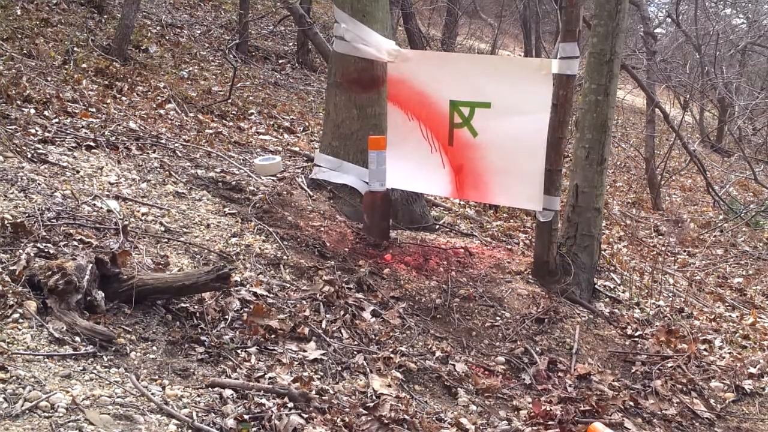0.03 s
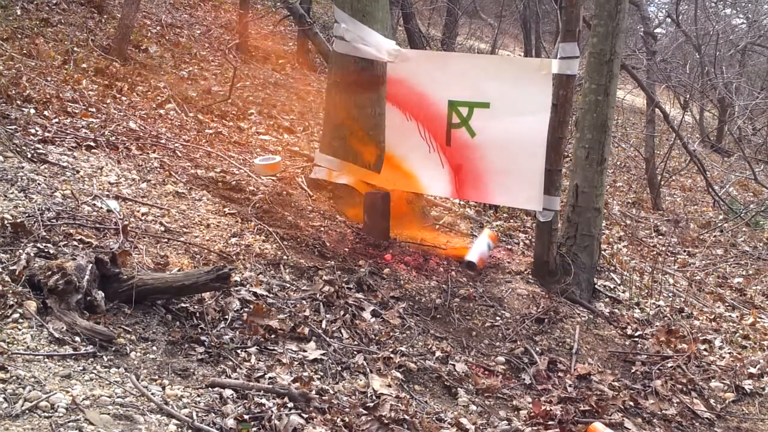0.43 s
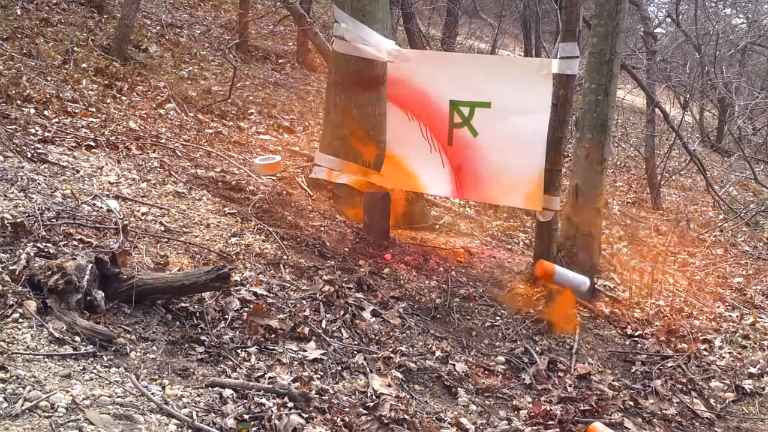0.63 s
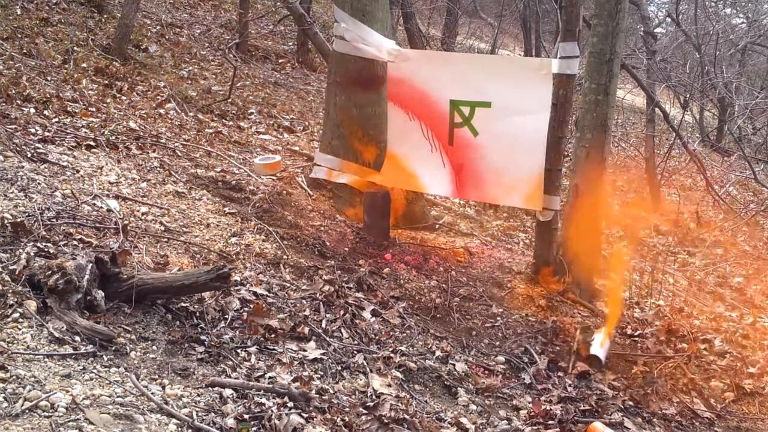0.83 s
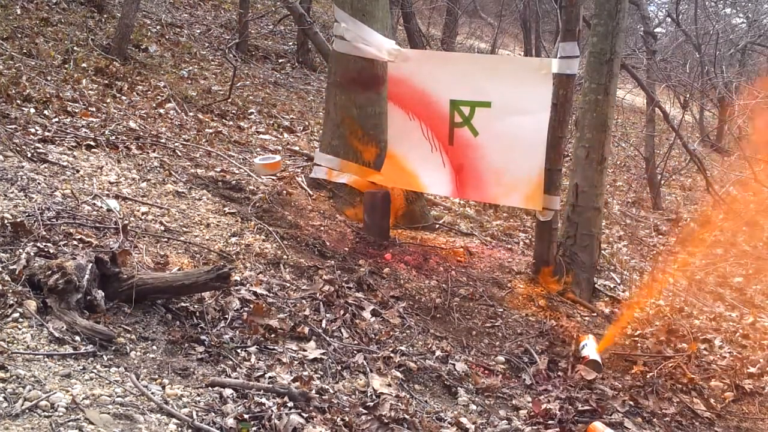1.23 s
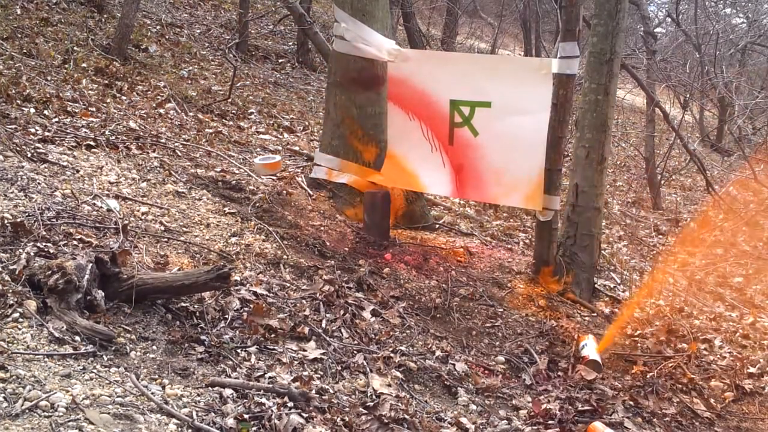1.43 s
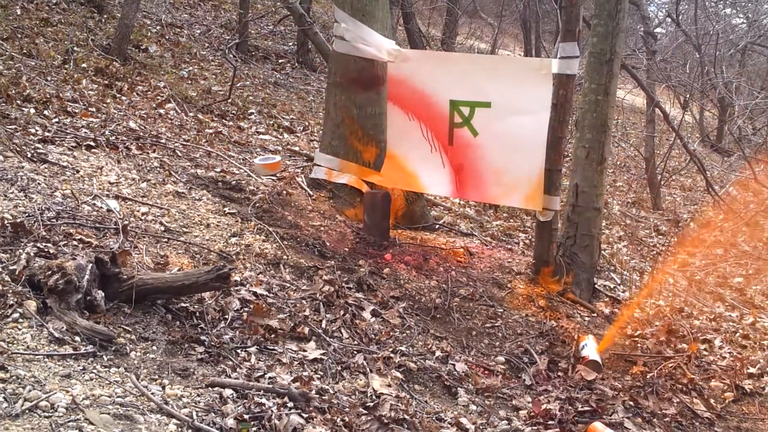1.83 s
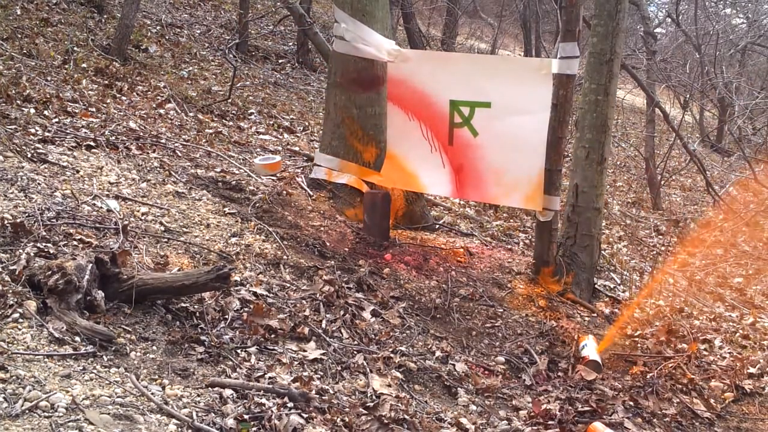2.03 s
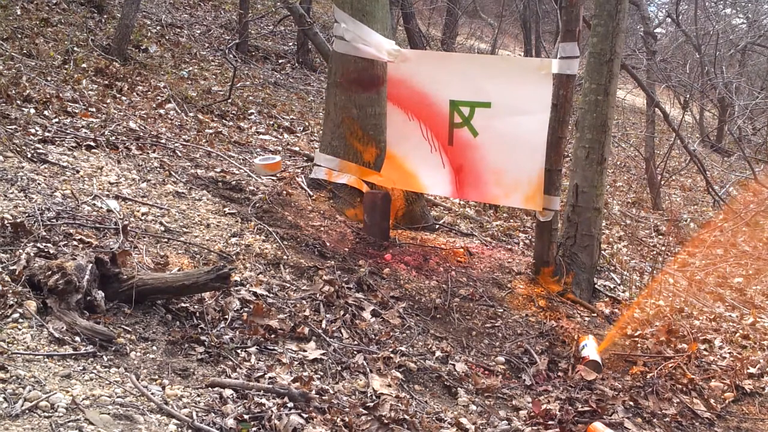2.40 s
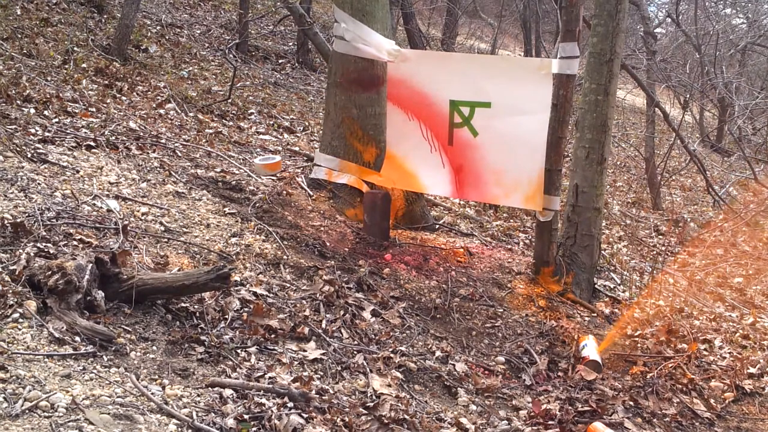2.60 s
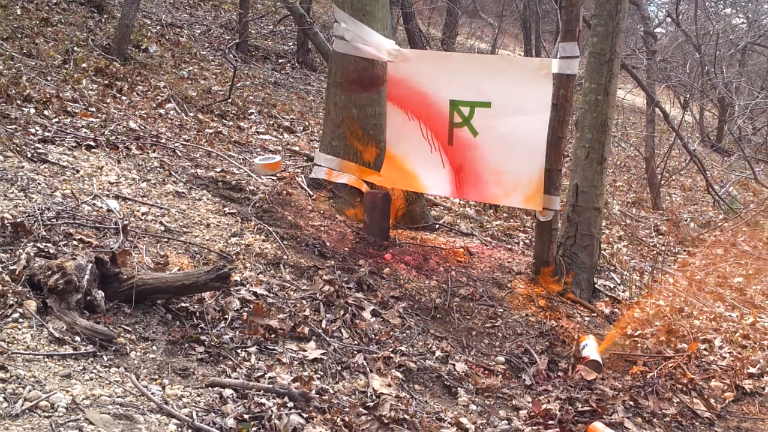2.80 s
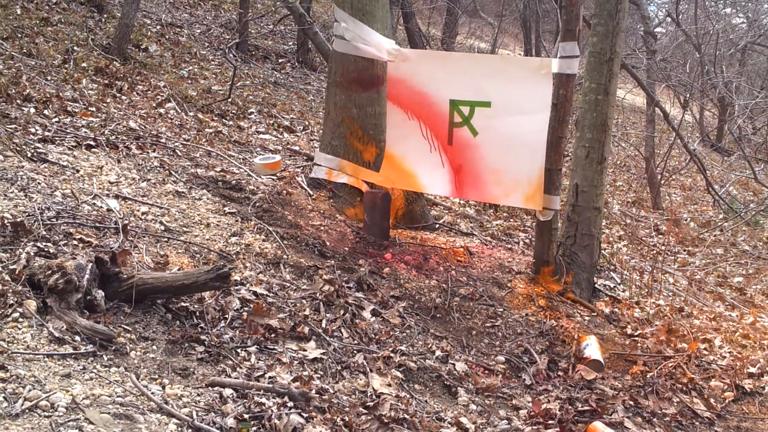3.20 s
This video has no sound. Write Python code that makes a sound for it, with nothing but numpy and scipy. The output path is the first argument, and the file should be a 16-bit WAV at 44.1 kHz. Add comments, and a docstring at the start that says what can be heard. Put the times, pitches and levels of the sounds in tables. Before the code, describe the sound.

A spray can hisses loudly in a quiet wood, punctured at about 0.2 seconds by a pellet's sharp, tinny crack. From 0.4 to 1.4 seconds it thuds and rolls through dry leaves, the hiss swirling and spitting. The hiss then steadies and thins, spurts around 2.7 seconds and fades out by 3.3. Two sharp clacks and a faint third sound close by around 3 seconds.

```python
"""A sharp crack and a tinny ring: a pellet tears into a spray can standing in a quiet wood.
Gas and paint hiss from the hole as the can falls, thuds and rolls through dry leaves, its jet swinging
towards and away from the listener. Then it lies still and hisses on, spurting as it runs empty.
Two sharp clacks and a faint third sound close by near the end; trunks scatter the sounds faintly."""
import sys
import numpy as np
from scipy import signal
from scipy.fft import rfft, irfft, next_fast_len
from scipy.io import wavfile
from scipy.ndimage import map_coordinates

SR = 44100
rng = np.random.default_rng(int(sys.argv[2]) if len(sys.argv) > 2 else 0)


def output_pcm(signal):
    """Save a mono or channel-first signal as 16-bit PCM at the path in sys.argv[1].

    Samples are clipped to [-1, 1] before scaling.
    """
    pcm = np.clip(np.atleast_2d(signal).T, -1, 1) * 32767
    wavfile.write(sys.argv[1], SR, np.round(pcm).astype(np.int16))


N = 147735
T = np.arange(N) / SR
AGE = np.arange(SR // 4) / SR  # time since an impact, s

# colour of the escaping spray: f/Hz, level/dB
JET_SPECTRUM = [(700, -30.5), (1020, -27), (1250, -30.5), (1720, -30.5), (1930, -22.5), (2540, -14),
                (3400, -14), (3800, -10.5), (4220, -12.5), (4650, -2.5), (5060, -7.5), (5600, 0),
                (6300, -1.5), (6850, -1), (7600, -7.5), (8740, -13.5), (9500, -10.5), (12500, -14.5),
                (14200, -19.5), (15700, -29)]


def amp(db):
    """Decibels to gain."""
    return 10 ** (np.asarray(db) / 20)


def unit(x):
    """Scale to rms 1."""
    return x / np.sqrt(np.mean(x ** 2) + 1e-20)


def along(points, hz):
    """Read (f/Hz, value) points on a log frequency axis."""
    freqs, values = np.transpose(points)
    return np.interp(np.log(hz + 1), np.log(freqs + 1), values)


def curves(rows):
    """One automation curve for each column after the time."""
    times, *columns = np.transpose(rows)
    return [np.interp(T, times, column) for column in columns]


def wobble(rate, size=N):
    """A smooth random curve, rate knots a second."""
    return map_coordinates(rng.standard_normal(4096), [T[:size] * rate], mode="wrap", order=2)


def filtered(x, response):
    """Shape x with a gain given as a function of frequency."""
    size = next_fast_len(len(x) + 2048, True)
    return irfft(rfft(x, size) * response(np.fft.rfftfreq(size, 1 / SR)), size)[:len(x)]


def low_cut(x, hz):
    """A fourth-order high-pass."""
    return signal.sosfilt(signal.butter(4, hz, "high", fs=SR, output="sos"), x)


def noise(spectrum, tilt_db=0, size=N):
    """Coloured noise of rms 1, tilted by tilt_db an octave."""
    white = rng.standard_normal(size)
    return unit(filtered(white, lambda hz: amp(along(spectrum, hz) + tilt_db * np.log2(hz + 1))))


def blow(t60, attack_s):
    """Envelope of one impact: a quick rise and an exponential fall."""
    return (1 - np.exp(-AGE / attack_s)) * amp(-60 * AGE / t60)


def burst(spectrum, t60, attack_s, tilt_db=0):
    """One dying burst of coloured noise."""
    return noise(spectrum, tilt_db, size=len(AGE)) * blow(t60, attack_s)


def ring(hz, t60, attack_s=0.00033):
    """One damped, slightly unsteady resonance."""
    return np.sin(2 * np.pi * hz * AGE + 0.61 * wobble(120, size=len(AGE))) * blow(t60, attack_s)


def placed(events):
    """Lay (t/s, level/dB, sound) events on one track."""
    track = np.zeros(N + SR)
    for s, db, sound in events:
        track[max(round(s * SR), 0):][:len(sound)] += amp(db) * sound
    return track[:N]


def background():
    """A bed of faint air and distant rumble, with a few soft puffs of air on the microphone."""
    # colours of the wood's air, the rumble and a puff: f/Hz, level/dB
    air_spectrum = [(25, -27), (100, -7), (220, -9), (380, -9), (640, -16), (1000, -13.5), (1700, -21.5),
                    (5000, -24.5), (12000, -31), (15000, -34)]
    rumble_spectrum = [(20, -35), (40, -16), (68, -4), (100, -8), (160, -13.5), (380, -8), (700, -24),
                       (1500, -38), (5000, -70)]
    puff_spectrum = [(25, -30), (45, -1), (70, 0), (105, 5), (160, -44), (400, -55), (2000, -100)]
    # puffs of air: t/s, level/dB, t60/s
    puff_events = [(0.038, -34, 0.12), (.1, -37.5, .14), (.33, -37, 0.18), (1.455, -40, 0.14)]
    puffs = placed((s, db, burst(puff_spectrum, t60, attack_s=0.0054)) for s, db, t60 in puff_events)
    air = amp(-51) * noise(air_spectrum)
    rumble = amp(-51 + 1.8 * wobble(8.12)) * noise(rumble_spectrum)
    return air + rumble + puffs


def trunks(send):
    """Diffuse scatter from the trees, each frequency dying at its own speed."""
    # decay of the scatter: f/Hz, t60/s
    decay = [(200, 0.37), (1000, 0.62), (2500, 0.55), (6000, 0.43), (14000, 0.11)]
    hz, t, bands = signal.stft(rng.standard_normal((SR * 3) // 4), SR, nperseg=256)
    tail = signal.istft(bands * amp(-60 * t / along(decay, hz)[:, None]), SR, nperseg=256)[1]
    predelayed = np.pad(send, (SR // 100, 0))
    return signal.fftconvolve(predelayed, tail / np.linalg.norm(tail))[:N]


def clack(t60, tilt_db, ring_hz, ring_db):
    """A hard, dry snap with two brief modes and a short rattle after it."""
    # colour of snap and rattle: f/Hz, level/dB
    spectrum = [(200, -35), (550, -37), (780, -9), (1150, 3), (1650, -8), (1900, -4), (2800, -7),
                (3400, -0.5), (4100, -4), (4900, 2), (5600, -9), (7400, -6), (8500, -14), (15000, -23)]
    snap = burst(spectrum, t60, attack_s=0.00016, tilt_db=tilt_db)
    rattle = amp(-10.5) * burst(spectrum, t60=0.072, attack_s=0.0017, tilt_db=tilt_db)
    high_mode = amp(ring_db) * ring(ring_hz, t60=0.02)
    low_mode = amp(-10.5) * ring(hz=1140, t60=0.02)
    return snap + rattle + high_mode + low_mode


def clacks():
    """Clacks close to the listener, from something too small to give any bass."""
    # the clacks: t/s, level/dB, t60/s, tilt/dB per octave, ring f/Hz, ring level/dB over the snap
    hits = [(2.9545, -16, 0.033, 0, 3000, 3.5), (3.0807, -5.5, 0.018, 0, 4500, -3),
            (3.156, -29.5, 0.03, 2, 4020, 7)]
    return low_cut(placed((s, db, clack(*shape)) for s, db, *shape in hits), hz=520)


def tumble():
    """Hollow thuds on the forest floor and the crunch of leaves under the rolling can."""
    # the can lands and bounces: t/s, level/dB, t60/s
    bounces = [(.4258, -13, 0.029), (.437, -29.5, 0.25), (.532, -20.5, 0.042), (0.5848, -15, 0.016),
               (.607, -30, 0.042), (.917, -32, .05), (0.929, -34.5, .05)]
    # colours of a thud and of the dry leaves: f/Hz, level/dB
    thud_spectrum = [(60, 2), (200, -18), (350, -3.5), (460, -0.5), (650, -30), (1100, 0.5), (1800, -16),
                     (2900, -9.5), (5000, -30), (12000, -45)]
    leaf_spectrum = [(40, -38), (90, -3.5), (180, -1), (350, 0.5), (650, -3.5), (1100, -4), (2000, -19),
                     (6000, -4), (14000, -44)]
    # rustle of the roll: t/s, level/dB
    roll = [(.42, -70), (.435, -33.5), (.5, -36), (.6, -30.5), (.68, -39), (.76, -57), (.84, -54.5),
            (.95, -37.5), (1.1, -41.5), (1.35, -58), (1.7, -83)]

    def thud(t60):
        """A dull impact plus the hollow knock of the can's body."""
        return burst(thud_spectrum, t60, attack_s=0.0011) + amp(-1.5) * ring(hz=380, t60=0.035)

    thuds = placed((s, db, thud(t60)) for s, db, t60 in bounces)
    crunch = unit(noise(leaf_spectrum) * amp(3.2 * wobble(250)))
    return thuds + amp(curves(roll)[0]) * crunch


def puncture():
    """The pellet strikes: a quick run of cracks as the wall tears, and a short tinny ring."""
    # the pellet's arrival and the tearing wall: t/s, level/dB, t60/s
    tears = [(0.2186, -21, 0.13), (.2241, -2.5, 0.022), (0.2276, -7, 0.029), (.2356, -5.5, 0.0098),
             (0.2391, -2.5, 0.013), (0.2469, -4.5, 0.034), (0.2575, -15.5, 0.077)]
    # colour of a crack: f/Hz, level/dB
    crack_spectrum = [(88, -50), (150, -21.5), (621, -19.5), (1030, -18), (1550, -17.5), (2240, -10.5),
                      (3870, -11), (4430, -4.5), (4980, 0.5), (6800, -7.5), (8590, -16), (12000, -16),
                      (15700, -28)]
    # modes of the can's wall: f/Hz, relative level/dB
    wall_modes = [(1012, 7.5), (2315, 3), (2720, 7), (5066, -2), (5997, 11), (6778, -1)]
    ring_start_s, ring_db = 0.2485, -18.5
    cracks = placed((s, db, burst(crack_spectrum, t60, attack_s=0.0002)) for s, db, t60 in tears)
    ringing = placed((ring_start_s, ring_db + db, ring(hz, t60=0.065, attack_s=0.0091))
                     for hz, db in wall_modes)
    return cracks + ringing


def spits():
    """Sudden spits of paint as the can jolts, in the colour of the jet."""
    # the spits: t/s, level/dB, t60/s, tilt/dB per octave
    jolts = [(0.5336, -7.5, 0.039, -2.5), (.5705, -3.5, 0.022, -3), (.584, -10, 0.036, -4),
             (.604, -13, .035, -6.5), (.684, -14, 0.05, -5.5), (.739, -29, 0.03, 3),
             (1.0565, -18, .04, -4.5), (1.072, -9, 0.033, -1.5), (1.252, -13.5, 0.045, -3)]
    spectrum = [(100, -90), (300, -62)] + list(JET_SPECTRUM)
    return placed((s, db, burst(spectrum, t60, attack_s=0.00051, tilt_db=tilt))
                  for s, db, t60, tilt in jolts)


def jet():
    """Gas and paint rush from the hole, changing colour as the can turns and sinking with the pressure."""
    # the jet swings round: t/s, hiss level/dB, roar level/dB over the hiss, fizz level/dB over the hiss
    swings = [(.27, -24.5, -9, -8), (.385, -31, -13, -9), (.425, -28, -2.5, -7), (.458, -21.5, -10.5, -18),
              (.475, -26, -9.5, -9), (.53, -24.5, -7.5, -9), (.545, -15.5, -19, -6),
              (.562, -12, -11.5, -3.5), (.585, -12.5, -9, -15), (.62, -19, -4, -10), (.632, -13, -4, -14),
              (.65, -14.5, -7, -4), (.675, -16, -11, -14), (.699, -9, -9.5, -8.5), (.73, -15, -8, -10),
              (.795, -25, -4.5, -8.5), (.848, -22, -4.5, -9.5), (.864, -11.5, -8, -17.5),
              (.912, -10.5, -17, -7), (.942, -16, -12.5, -5.5), (.965, -10.5, -15.5, -12),
              (1.008, -14, -12, -12), (1.02, -17.5, -10, -8), (1.046, -26.5, -9, -3),
              (1.058, -13, -13, -19), (1.09, -14.5, -14, -9.5), (1.12, -11, -14.5, -6.5),
              (1.16, -12.5, -13, -7.5), (1.27, -17, -14, -14), (1.33, -17, -13, -9),
              (1.425, -11.5, -16, -7), (1.52, -16, -13, -10.5), (1.61, -18, -14, -10)]
    # gain ride for the last spurts of the emptying can: t/s, level/dB
    emptying = [(2.6, -2.5), (2.66, -2), (2.7, 0.96), (2.735, -4.5), (2.77, -3), (2.81, 0.2), (2.87, -5),
                (2.94, -4), (3.0, -7), (3.1, -9), (3.18, -15), (3.26, -28), (3.35, -37)]
    puncture_s, rise_s, roll_end_s, sag_start_s = 0.246, 0.004, 1.42, 1.72
    roar_edge_hz, fizz_edge_hz = 3900, 8090
    opening = np.clip((T - puncture_s) / rise_s, 0, 1)
    rolling = np.clip((roll_end_s - T) * 2, 0, 1)
    sag_s = np.maximum(T - sag_start_s, 0)
    gas = noise([(100, -46), (400, -31)] + list(JET_SPECTRUM))

    # the echo off the ground flanges the jet while the can rolls
    delay_s = 0.00061 * np.exp(0.35 * wobble(6))
    echo_gain = 0.26 * rolling
    echo = echo_gain * map_coordinates(gas, [(T - delay_s) * SR])
    gas = (gas + echo) / np.sqrt(1 + echo_gain ** 2)

    # three bands; the balance thins towards fizz as the pressure sinks
    lows = filtered(gas, lambda hz: 1 / (1 + (hz / roar_edge_hz) ** 16))
    body = filtered(gas, lambda hz: 1 / (1 + (hz / fizz_edge_hz) ** 16))
    hiss_db, roar_db, fizz_db = curves(swings)
    roar = amp(roar_db - 0.8 * sag_s) * unit(lows)
    hiss = unit(body - lows)
    fizz = amp(fizz_db + 3.5 * sag_s) * unit(gas - body)

    sputter_db = 0.5 * wobble(600)
    flutter_db = (0.62 + 0.93 * rolling) * wobble(90)
    pressure_db = curves(emptying)[0] - 3 * sag_s
    return opening * amp(hiss_db + pressure_db + sputter_db + flutter_db) * (roar + hiss + fizz)


def scene():
    """The mono mix: can and clacks feed the trunks' scatter, over the bed of the wood."""
    can = puncture() + tumble() + jet() + spits()
    near = clacks()
    scatter = trunks(amp(-15) * can + amp(-22.5) * near)
    return (can + near + scatter + background())[None]


def record(dry):
    """Thin the deep bass, round the highest peaks and cut the very top."""
    ceiling, top_hz = 1.3, 15850
    thinned = low_cut(dry[0], hz=37)
    rounded = thinned / (1 + np.abs(thinned / ceiling) ** 6) ** (1 / 6)
    return filtered(rounded, lambda hz: hz < top_hz)[None]


dry = scene()
out = record(dry)
output_pcm(out)
```